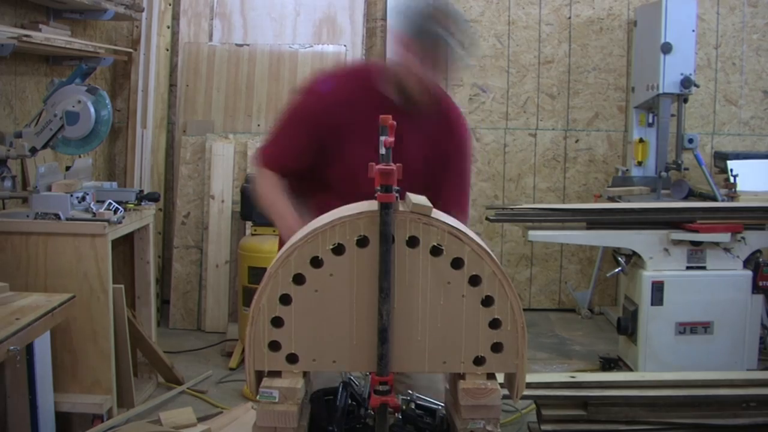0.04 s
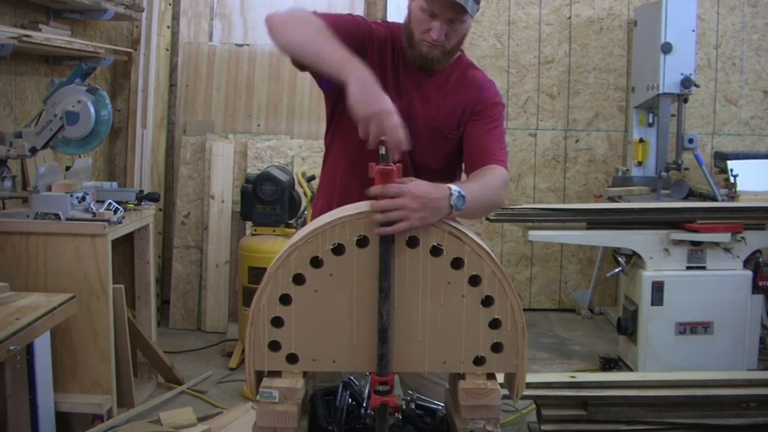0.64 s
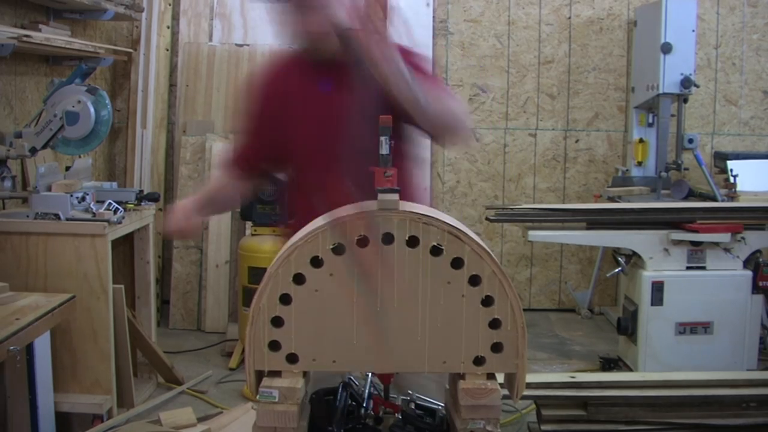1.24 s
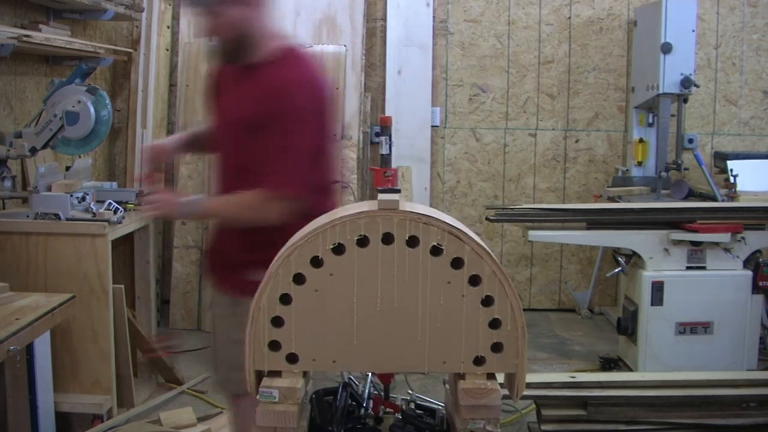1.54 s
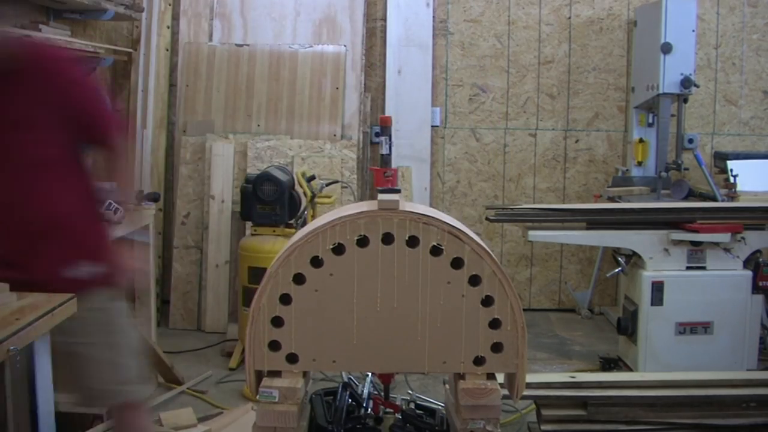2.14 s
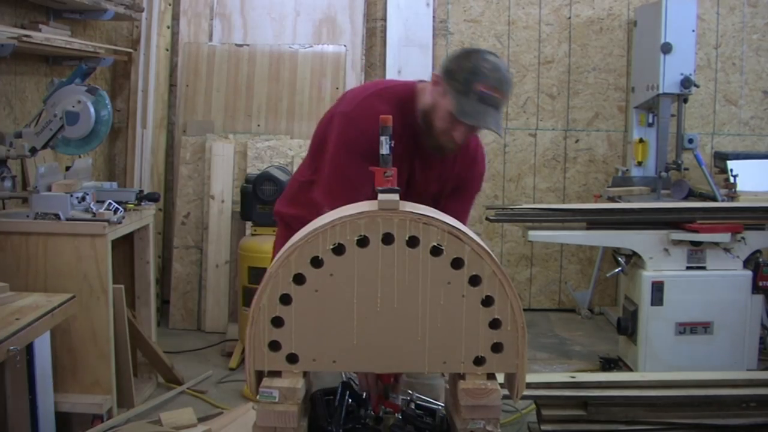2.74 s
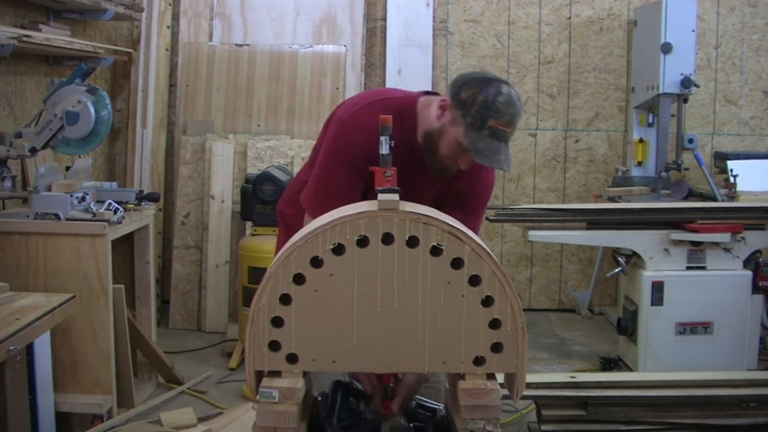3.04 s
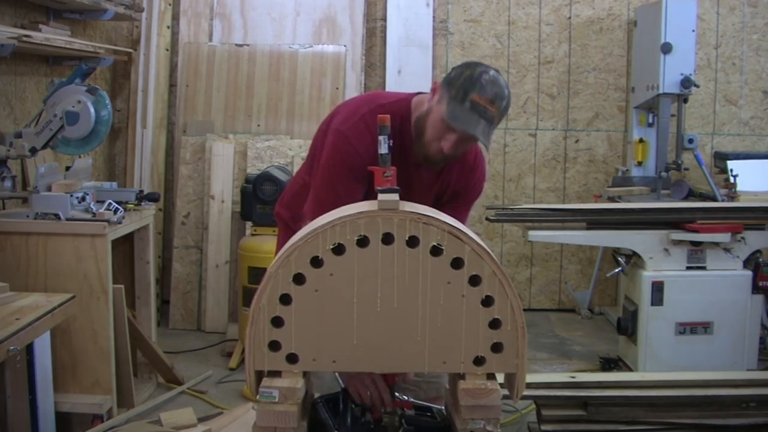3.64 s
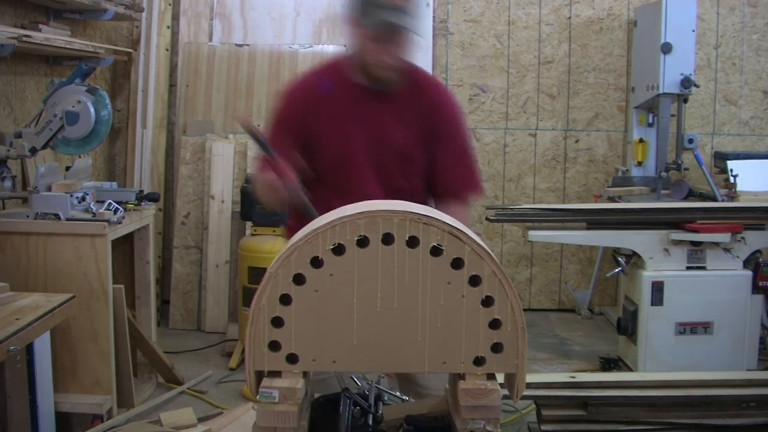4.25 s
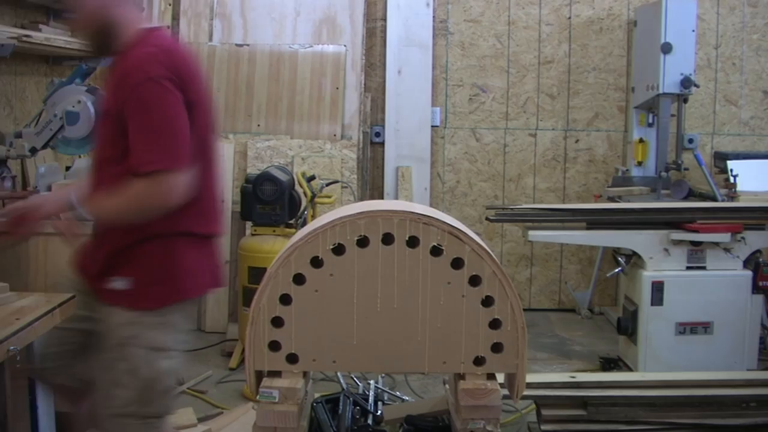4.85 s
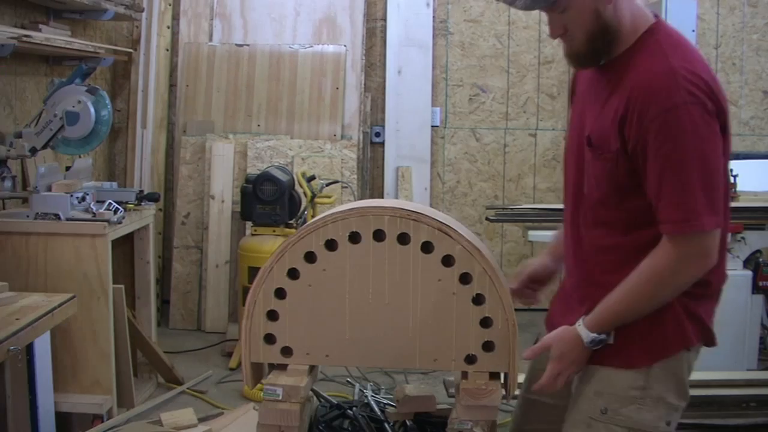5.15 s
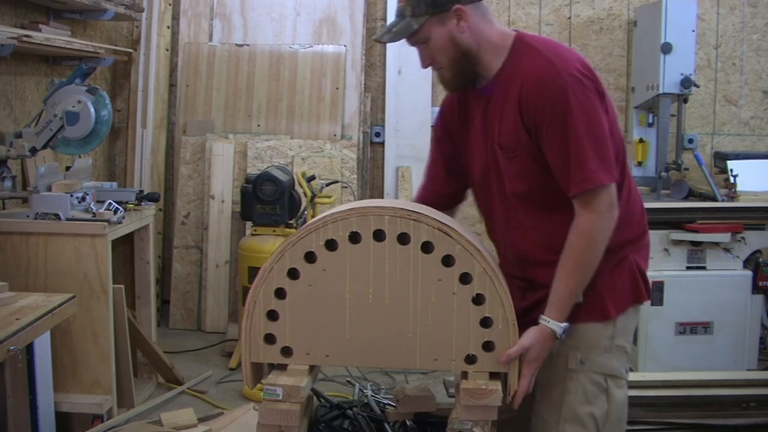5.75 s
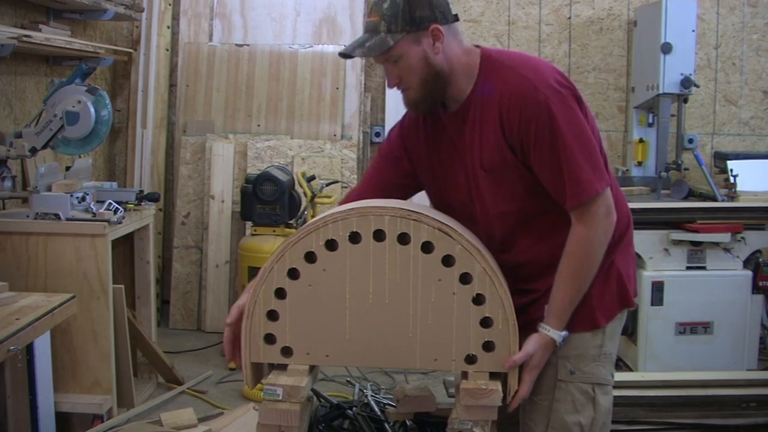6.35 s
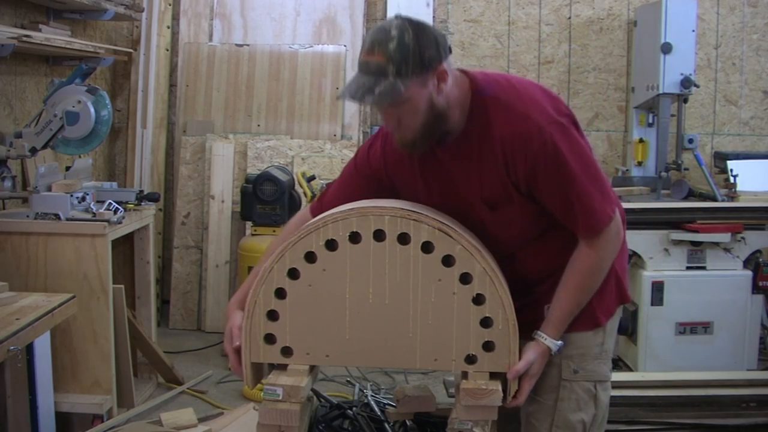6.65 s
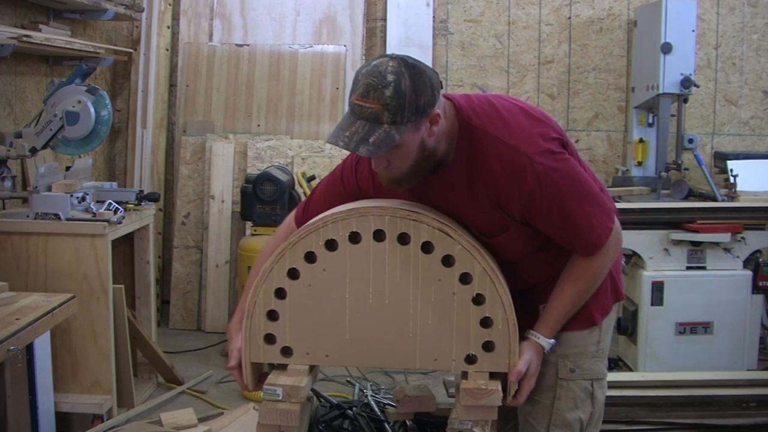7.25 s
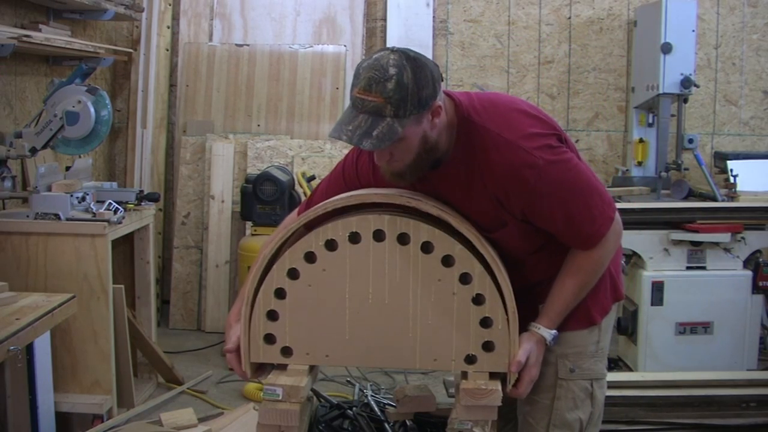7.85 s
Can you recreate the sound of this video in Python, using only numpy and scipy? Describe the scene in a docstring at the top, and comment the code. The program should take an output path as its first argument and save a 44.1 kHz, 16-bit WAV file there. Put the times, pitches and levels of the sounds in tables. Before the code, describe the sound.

Metal pipe clamps squeak, clank and rattle against a hollow wooden form in a workshop, with shoe scuffs and creaking wood.

```python
"""Pipe clamps are cranked loose and pulled off a hollow plywood bending form in a small workshop.
First a crank is wrenched round and its screw sticks and slips in squeaks. Shoes scuff, the handle clinks,
and near 2 s a clamp is stood on the floor. From about 3 s loose jaws chatter on the steel pipe and knock
the form. Wood drags over wood, the heap of spare clamps is jolted near 7 s, and last the bent wood creaks
as hands work it free. Each contact is a burst of tiny impacts played through a resonant body."""
import sys
import numpy as np
from scipy import signal
from scipy.fft import rfft, irfft, next_fast_len
from scipy.io import wavfile
from scipy.ndimage import uniform_filter1d

SR = 44100
rng = np.random.default_rng(int(sys.argv[2]) if len(sys.argv) > 2 else 0)


def generate_wav(sig):
    """Save sig (samples, or channels by samples) to the path in sys.argv[1] as 16-bit PCM at SR."""
    pcm = np.round(np.clip(np.atleast_2d(sig).T, -1, 1) * 32767).astype(np.int16)
    wavfile.write(sys.argv[1], SR, pcm)


N = 353241

# room tone, the spectrum of its hush and a faint electrical whine: f/Hz, level/dB
HUSH_SPECTRUM = [(15, -30), (25, -11.5), (96, -0.5), (189, 0.5), (255, 1), (307, -6.5), (527, -4.5),
                 (672, -10.5), (791, -7), (1040, -12.5), (1180, -12.5), (1590, -13), (3050, -16.5),
                 (3580, -18), (15800, -28.5)]
WHINE_TONES = [(3090, -79.5)]
# stereo width of the hush and of the action: f/Hz, side level against mid/dB
HUSH_WIDTH = [(60, -7.5), (180, -5.5), (550, -0.5), (1650, -2), (4970, -2.5), (15000, -1.5)]
ACTION_WIDTH = [(60, -20.5), (200, -16), (500, -15.5), (1000, -8), (2000, -10.5), (4000, -5), (8000, -3.5),
                (13000, -0.5)]

# broad tone colour of each body: f/Hz, relative level/dB
SCRAPE_SPECTRUM = [(100, -36), (500, 4.5), (900, 14.5), (1300, 10.5), (2000, 7.5), (3500, 5), (5000, 0.5),
                   (7500, -4), (11000, -8), (15500, -21)]
FLOOR_SPECTRUM = [(60, 0), (200, 5), (600, -2), (1400, 1), (3000, -1.5), (5500, -5), (8500, -17),
                  (12500, -25), (15000, -42)]
THUD_SPECTRUM = [(20, -27.5), (55, -3), (90, -18.5), (200, -0.5), (330, -11.5), (600, -57), (2000, -41),
                 (16000, -83)]
FORM_SPECTRUM = [(30, -23), (100, -18.5), (160, 3.5), (260, 0), (400, 6.5), (680, 4.5), (900, -1),
                 (1600, -26), (4000, -42), (16000, -110.5)]
SNAP_SPECTRUM = [(100, -18), (350, 3.5), (800, -10), (1400, 1), (3000, -6), (8000, -27), (15500, -54)]
CREAK_SPECTRUM = [(60, -20), (200, 1.5), (420, 9.5), (800, -11.5), (2000, -9), (4000, -21), (16000, -31)]
STEEL_SPECTRUM = [(300, -54), (1500, -11), (2500, 12.5), (4500, 8.5), (7500, -9.5), (11000, -18),
                  (15500, -25)]
SCREW_SPECTRUM = [(300, -33.5), (1100, -19.5), (1700, -4.5), (2100, -12.5), (2700, -14.5), (7500, -27),
                  (15000, -43.5)]
# resonances on top of that colour: f/Hz, width/Hz, level against the spectrum/dB
SCRAPE_PEAKS = [(1270, 40, 0.83), (2650, 50, 2.3), (2890, 66, 1.67), (4260, 220, 1.9)]
FLOOR_PEAKS = [(1110, 28, 3.3), (1870, 160, 6.6), (2210, 170, 7.1), (3770, 210, 16), (4737, 150, 15),
               (6675, 92, 14), (10830, 220, 26), (12100, 150, 25)]
FORM_PEAKS = [(169.2, 25, 9), (221, 10, 5), (366.8, 64, 13), (503.4, 57, 5.5), (707.5, 54, 5),
              (800, 41, -8)]
CREAK_PEAKS = [(395.2, 23, 16.5), (515, 49, 18.6), (696, 240, 9.5), (1031, 27, 22.2), (1410, 60, 5.8),
               (1920, 44, 6.6)]
HEAP_PEAKS = [(2350, 66, 2.8), (2470, 77, 3.3), (2900, 310, 3.7), (3440, 87, 4.7), (4130, 130, 14),
              (5180, 150, 13), (5530, 190, 18.7), (7350, 590, 22.3), (10034, 60, 27), (11040, 99, 32.3)]
CRANK_PEAKS = [(2680, 120, 11), (2660, 48, 4.3), (2910, 81, 5.1), (3100, 67, 2.5), (3980, 73, 10.6),
               (5300, 150, 11.6), (6600, 150, 9.7), (7530, 160, 20), (8930, 320, 8.5)]
SCREW_PEAKS = [(1517, 60, 10.4), (1738, 55, 8.6), (1880, 56, 20.4), (1908, 59, 18), (2008, 37, 15),
               (3700, 440, 8.5)]
# ringing modes of the crank pin and of the jaws on their pipe: f/Hz, relative level/dB, t60/s
PIN_MODES = [(7987, 3, 0.25), (10850, -12, .12), (11150, -22, .08), (13848, -18, 0.13), (15396, -15, 0.2)]
JAW_MODES = [(2840, 1, .07), (4146, 12.5, 0.05), (5180, 14.5, 0.028), (5490, 12, 0.023), (6000, -12, 0.029),
             (6970, 14, 0.038), (7550, 8, .04), (7580, 6.5, 0.069), (8000, 1, .07), (8750, 2, 0.036),
             (10000, -7.5, 0.052), (10970, 8.5, 0.042), (11870, -7, 0.065), (14600, -5, .1)]

# shoes, clothes and hands scuff: t/s, length/s, level/dB, tilt/(dB per octave)
SCUFFS = [(0.273, 0.039, -50, 1.5), (0.985, 0.031, -56.5, 6.5), (1.085, 0.0093, -43.5, -3),
          (1.469, 0.02, -51, 4.5), (1.682, .05, -55.5, -0.5), (1.9, 0.021, -39, 0.5),
          (2.176, 0.028, -50, 2), (2.254, 0.018, -51, 1.5), (2.373, 0.017, -46.5, 1),
          (2.589, 0.047, -42, -1.5), (2.644, 0.017, -45.5, 4), (3.859, 0.011, -50, 0.5),
          (4.441, .018, -60, 10), (4.624, .017, -51, 7), (4.801, .028, -51, 0.5),
          (4.986, 0.022, -44.5, -3.5), (5.266, 0.12, -50.5, 6.5), (5.617, 0.1, -48, 1.5),
          (5.715, 0.042, -46.5, 1), (6.112, 0.14, -48.5, 2.5)]
# a jaw slips free and strikes the wood: t/s, level/dB, tilt/(dB per octave)
SNAPS = [(0.193, -40, -9), (0.199, -32, -6), (0.542, -17.5, 6), (.629, -20.5, -1.5), (3.142, -29, 3),
         (3.444, -27, 5), (4.201, -22.5, -1.5), (6.951, -30, -9), (7.752, -42, -18)]
# cues for the simple contacts: t/s, length/s, level/dB
SET_DOWN = [(1.899, 0.013, -47), (1.972, .015, -27.5)]  # a clamp is stood on the floor
THUDS = [(1.902, 0.017, -35), (1.984, 0.03, -41), (4.189, 0.019, -36.5), (5.495, 0.048, -52),
         (6.09, 0.018, -52)]  # weight lands on floor and bench
BUMPS = [(.069, 0.0068, -52.5), (.955, 0.063, -46.5), (1.0, 0.028, -47.5), (1.85, 0.012, -40),
         (1.9, 0.025, -37.5), (2.535, 0.026, -47.5), (3.003, 0.016, -44.5), (3.759, 0.0049, -42),
         (3.807, 0.014, -38), (3.855, 0.081, -46.5), (5.325, .1, -42), (5.98, 0.19, -49),
         (6.092, 0.15, -46), (6.958, 0.086, -35)]  # hands and knees meet the form
DRAGS = [(.194, 0.02, -31), (4.174, .01, -47), (4.191, 0.028, -29.5), (6.203, .035, -44),
         (6.238, 0.062, -34), (7.945, 0.079, -44.5)]  # wood barks over wood
CREAKS = [(7.3, 0.026, -44.5), (7.367, 0.062, -37), (7.638, 0.075, -44.5), (7.742, 0.046, -41),
          (7.85, 0.24, -43), (7.925, 0.017, -37)]  # the bent wood is worked off
TINKLES = [(0.352, .005, -78), (3.158, 0.0074, -41.5), (5.309, 0.02, -34)]  # the loose crank pin
RATTLES = [(6.945, 0.045, -31), (6.963, 0.065, -25.5)]  # the heap of clamps under the form
CLINKS = [(1.474, .017, -54), (1.58, 0.019, -62), (1.675, 0.012, -51.5), (1.725, .013, -56.5),
          (4.504, 0.019, -53.5)]  # the handle swings on a carried clamp
SQUEAKS = [(.218, 0.019, -33.5), (.285, 0.021, -52.5), (.541, 0.018, -17.5), (.598, 0.026, -27.5),
           (4.173, .005, -29)]  # the screw thread
# cues for shoves on a clamp: t/s, length/s, wood level/dB, rasp level/dB, steel level/dB
CRANK_SHOVES = [(.193, 0.042, -47, -44.5, -51), (.51, .038, -48.5, -54.5, -61),
                (.536, 0.02, -37.5, -31.5, -25.5), (.601, 0.038, -53.5, -37, -36.5),
                (.627, 0.016, -20, -21, -35), (.706, .019, -30, -25.5, -68)]
JAW_SHOVES = [(2.879, .024, -43.5, -49, -47), (2.905, .025, -27, -32.5, -45),
              (3.028, 0.019, -43.5, -47.5, -59), (3.063, 0.07, -29.5, -38, -44),
              (3.093, 0.004, -22, -32.5, -39), (3.139, 0.014, -35, -30, -35.5),
              (3.168, 0.0058, -38, -42, -56), (3.184, 0.02, -25.5, -36.5, -49),
              (3.21, 0.022, -27.5, -31.5, -30), (3.263, 0.028, -33, -42.5, -45.5),
              (3.376, 0.013, -19.5, -25, -39), (3.437, .022, -23.5, -26.5, -26.5),
              (3.527, 0.005, -27, -43, -54), (3.559, 0.022, -31, -41, -40.5),
              (3.651, 0.022, -25.5, -34, -32), (3.957, 0.021, -35, -51, -56),
              (4.042, 0.029, -34, -46.5, -54), (4.184, 0.025, -15.5, -33, -49),
              (4.224, 0.016, -28.5, -26, -28), (5.302, 0.072, -37, -38.5, -62),
              (5.568, 0.058, -46.5, -49, -59), (6.945, 0.069, -36.5, -30.5, -41)]


def gain_of(db):
    """Decibels to amplitude."""
    return 10 ** (np.asarray(db) / 20)


def unit_rms(x):
    """Scales to rms 1."""
    return x / np.sqrt(np.mean(x ** 2) + 1e-20)


def curve_db(points, hz):
    """Reads an EQ curve on a log-frequency axis."""
    f, db = np.transpose(points)
    return np.interp(np.log(hz + 1), np.log(f + 1), db)


def equalise(x, points):
    """Filters a signal by an EQ curve."""
    size = next_fast_len(len(x))
    gain = gain_of(curve_db(points, np.fft.rfftfreq(size, 1 / SR)))
    return irfft(rfft(x, size) * gain, size)[:len(x)]


def body(spectrum, peaks=(), tilt_db=0, tilt_span_hz=(1, 2), size=8192):
    """A body's impulse response: broad colour, resonances and a brightness tilt in dB per octave."""
    hz = np.fft.rfftfreq(size, 1 / SR)
    colour_db = curve_db(spectrum, hz) + tilt_db * np.log2(np.clip(hz, *tilt_span_hz))
    lift = 1 + sum(gain_of(db) ** 2 / (1 + (2 * (hz - f) / width) ** 2) ** 2 for f, width, db in peaks)
    log_gain = np.log(gain_of(colour_db) * np.sqrt(lift))
    cepstrum = irfft(log_gain)[:size // 2]
    cepstrum[1:] *= 2  # minimum phase: nothing sounds before the hit
    return irfft(np.exp(rfft(cepstrum, size)))[:size // 2]


def ring(modes, spread_db, detune, size=11000):
    """Dying steel modes; each point of contact and grip shifts their balance and pitch a little."""
    hz, db, t60 = np.transpose(modes)[:, :, None]
    t = np.arange(size) / SR
    strength, phase, shift = rng.standard_normal((3, len(modes), 1))
    turns = hz * (1 + detune * shift) * t + phase
    envelope = gain_of(db + spread_db * strength - 60 * t / t60)
    return (envelope * np.sin(2 * np.pi * turns)).sum(0)


def chatter(attack_s, fall_s, grain_db, per_s, noise, lead_s=.02, size=16000):
    """A faint lead-in, then tiny impacts that swell and die. Returns drive, energy and lead-in time."""
    since_peak = np.arange(size) / SR - lead_s - attack_s
    swell = (np.maximum(-since_peak, 0) / max(0.96 * attack_s, 1e-3)) ** 1.14
    decay = (np.maximum(since_peak, 0) / max(fall_s, 1e-3)) ** 1.125
    lead_in_gain = gain_of(-9 * (since_peak < -attack_s))
    envelope = np.exp(-swell - decay) * lead_in_gain
    strengths = gain_of(grain_db * np.minimum(rng.exponential(1, size), np.pi))
    impacts = strengths * (rng.random(size) < per_s / SR)
    grains = unit_rms(impacts * rng.choice([-1, 1], size)) + noise * rng.standard_normal(size)
    # level the grains over a few milliseconds, so the push of the hand sets the force
    local_rms = np.sqrt(abs(uniform_filter1d(grains ** 2, size=300)) + 1e-9)
    return envelope * grains / local_rms, np.sum(envelope ** 2), lead_s


def add(mix, s, contact, response, db):
    """Plays a contact through a body and lays it into the mix at time s and the given level."""
    drive, energy, lead_s = contact
    sound = signal.fftconvolve(drive, response)
    sound *= gain_of(db) * np.sqrt(energy / (np.sum(sound ** 2) + 1e-20))
    start = round((s - lead_s) * SR)
    sound = sound[max(-start, 0):]
    part = mix[max(start, 0):][:len(sound)]
    part += sound[:len(part)]


def knocks(cues, response, attack_s, per_s):
    """Grainy contacts on one object, all with the same attack."""
    out = np.zeros(N)
    for s, length, db in cues:
        add(out, s, chatter(attack_s, length, grain_db=-3.5, per_s=per_s, noise=.42), response, db)
    return out


def room_tone(hush_db=-59.5):
    """The bed: a wide, steady hush with a thin electrical whine."""
    mid, side = (unit_rms(equalise(z, HUSH_SPECTRUM)) for z in rng.standard_normal((2, N)))
    side = equalise(side, HUSH_WIDTH)
    t = np.arange(N) / SR
    whine = sum(np.sqrt(2) * gain_of(db) * np.sin(2 * np.pi * hz * t) for hz, db in WHINE_TONES)
    return gain_of(hush_db) * np.array([mid + side, mid - side]) + whine


def workshop(x, wet_db=-14, t60=0.03, size=12000):
    """A tight tail of echoes off benches and walls; sound scattered from the sides adds width."""
    t = np.arange(size) / SR
    echoes = rng.choice([-1, 1], size) * (rng.random(size) < 3000 / SR)
    echoes = echoes * gain_of(-60 * t / t60) * (t > .001)
    mid = x + gain_of(wet_db) * signal.oaconvolve(x, echoes / np.linalg.norm(echoes))[:N]
    frames = signal.stft(mid, nperseg=512, noverlap=256)[2]
    scattered = signal.istft(frames * np.exp(2j * np.pi * rng.random(frames.shape)))[1]
    side = equalise(np.pad(scattered, (130, 0))[:N], ACTION_WIDTH)  # 3 ms late
    return np.array([mid + side, mid - side])


def form_boom(tilt_db):
    """The boom of the hollow plywood form."""
    return body(FORM_SPECTRUM, FORM_PEAKS, tilt_db, (150, 900))


def rasp(tilt_db, colour_db, width_hz=50):
    """The rasp of touching surfaces; each spot has short resonances of its own."""
    spot_peaks = [(hz, width_hz, colour_db) for hz in rng.uniform(1500, 15500, 14)]
    return body(SCRAPE_SPECTRUM, SCRAPE_PEAKS + spot_peaks, tilt_db, (1200, 14000))


def scuffs():
    """Brief brushes, each as bright as the surface it meets, with a little wood behind them."""
    out = np.zeros(N)
    for s, length, db, tilt_db in SCUFFS:
        contact = chatter(0.016, length, grain_db=-0.5, per_s=1600, noise=0.91)
        add(out, s, contact, rasp(tilt_db, colour_db=3.5), db)
        add(out, s, contact, form_boom(tilt_db=9), db - 4.5)
    return out


def walking():
    """Movement foley: a clamp stood on the floor, scuffs and the low thud of weight landing."""
    set_down = knocks(SET_DOWN, body(FLOOR_SPECTRUM, FLOOR_PEAKS), attack_s=0.015, per_s=1800)
    return set_down + scuffs() + knocks(THUDS, body(THUD_SPECTRUM), attack_s=0.008, per_s=840)


def rubs(cues, attack_s, wood_db, wood_tilt_db, rasp_db, rasp_tilt_db):
    """Soft, fine-grained contacts that blend boom and rasp and leave the steel still."""
    out = np.zeros(N)
    for s, length, db in cues:
        contact = chatter(attack_s, length, grain_db=-4, per_s=1500, noise=0.92)
        add(out, s, contact, form_boom(wood_tilt_db), db + wood_db)
        add(out, s, contact, rasp(rasp_tilt_db, colour_db=5.5), db + rasp_db)
    return out


def snaps():
    """Sharp accents: a jaw slips free and strikes the wood once, hard."""
    out = np.zeros(N)
    for s, db, tilt_db in SNAPS:
        blow = chatter(attack_s=0, fall_s=0.0014, grain_db=-0.5, per_s=1900, noise=0.23)
        add(out, s, blow, body(SNAP_SPECTRUM, (), tilt_db, (700, 12000)), db)
    return out


def woodwork():
    """The form is bumped, dragged and struck; the bent wood creaks and rubs as it comes free."""
    bumps = rubs(BUMPS, attack_s=0.014, wood_db=-1, wood_tilt_db=-1.4, rasp_db=-13.5, rasp_tilt_db=-1.5)
    drags = rubs(DRAGS, attack_s=0.0085, wood_db=-3.5, wood_tilt_db=11.5, rasp_db=0, rasp_tilt_db=-10.5)
    creaks = knocks(CREAKS, body(CREAK_SPECTRUM, CREAK_PEAKS), attack_s=0.011, per_s=650)
    friction = rubs(CREAKS, attack_s=.051, wood_db=-11, wood_tilt_db=4.5, rasp_db=-16.5, rasp_tilt_db=-6)
    return bumps + drags + creaks + friction + snaps()


def pin_tinkles():
    """The loose crank pin: each of its modes takes a set share of every touch."""
    out = np.zeros(N)
    for s, length, db in TINKLES:
        contact = chatter(0.017, length, grain_db=1.5, per_s=490, noise=.5)
        for hz, mode_db, t60 in PIN_MODES:
            add(out, s, contact, ring([(hz, 0, t60)], spread_db=0, detune=0), db + mode_db)
    return out


def heap_rattle():
    """A jolt sets the spare clamps rattling, steel on steel."""
    return knocks(RATTLES, body(STEEL_SPECTRUM, HEAP_PEAKS), attack_s=0.0059, per_s=1300)


def shoves(cues, steel, colour_db, grain_db, wood_tilt_db, rasp_tilt_db, usual_db=-28):
    """A shoved clamp knocks the form, rasps and rings; more force means brighter wood, duller rasp."""
    out = np.zeros(N)
    for s, length, wood_db, rasp_db, steel_db in cues:
        contact = chatter(0.012, length, grain_db, per_s=1400, noise=0.95)
        force_db = wood_db - usual_db
        add(out, s, contact, form_boom(wood_tilt_db + 0.45 * force_db), wood_db)
        add(out, s, contact, rasp(rasp_tilt_db - 0.1 * force_db, colour_db), rasp_db)
        add(out, s, contact, steel(), steel_db)
    return out


def crank():
    """The wrenched crank shifts its clamp on the form; the same handle clinks as it swings free."""
    handle = body(STEEL_SPECTRUM, CRANK_PEAKS)
    turns = shoves(CRANK_SHOVES, lambda: handle,
                   colour_db=3, grain_db=-0.5, wood_tilt_db=12.5, rasp_tilt_db=-0.5)
    return turns + knocks(CLINKS, handle, attack_s=0.012, per_s=660)


def screw_squeaks():
    """The thread sticks and slips, waking narrow resonances."""
    return knocks(SQUEAKS, body(SCREW_SPECTRUM, SCREW_PEAKS), attack_s=0.013, per_s=1300)


def jaw_clanks():
    """Loose jaws chatter on the pipe and knock the form, with a fresh ring on every hit."""
    return shoves(JAW_SHOVES, lambda: ring(JAW_MODES, spread_db=2.5, detune=0.0056),
                  colour_db=10, grain_db=4, wood_tilt_db=0.2, rasp_tilt_db=1)


def scene():
    """All the action in the workshop, a touch left of centre, over the room tone."""
    clamps = crank() + screw_squeaks() + jaw_clanks() + heap_rattle() + pin_tinkles()
    pan = gain_of([[.6], [-.6]])
    return workshop(clamps + woodwork() + walking()) * pan + room_tone()


def record(dry):
    """A steep low-pass at 15.9 kHz trims the very top of the mix."""
    low_pass = signal.firwin(511, 15900, window=("kaiser", 9), fs=SR)
    return signal.oaconvolve(dry, low_pass[None], "same")


dry = scene()
out = record(dry)
generate_wav(out)
```